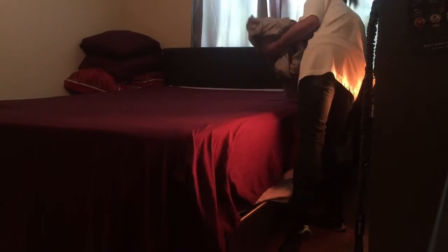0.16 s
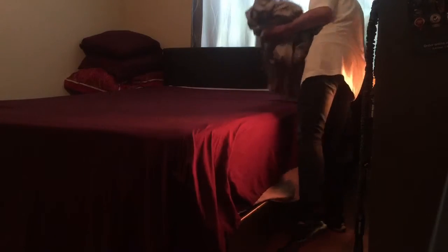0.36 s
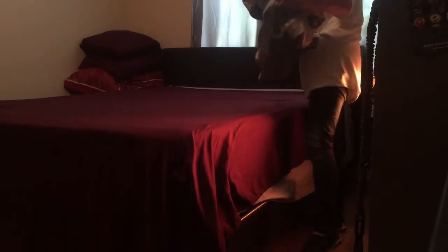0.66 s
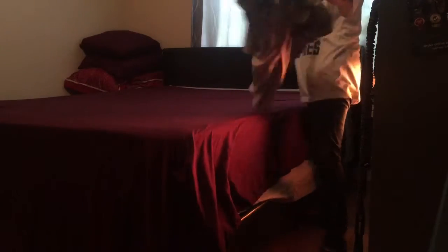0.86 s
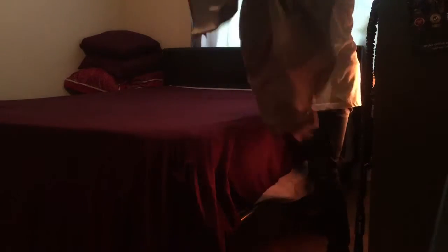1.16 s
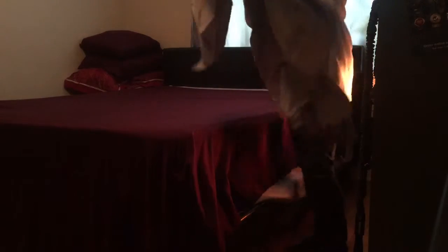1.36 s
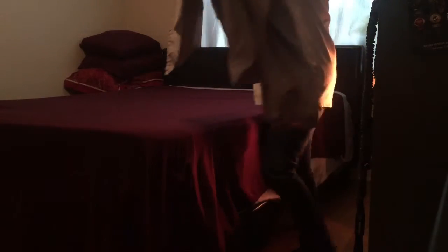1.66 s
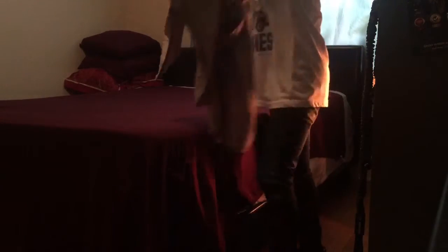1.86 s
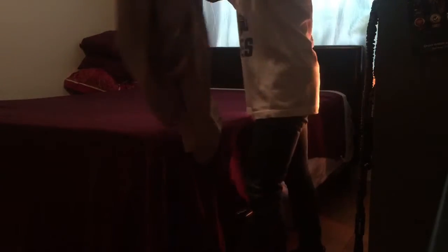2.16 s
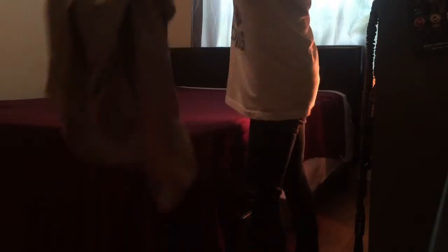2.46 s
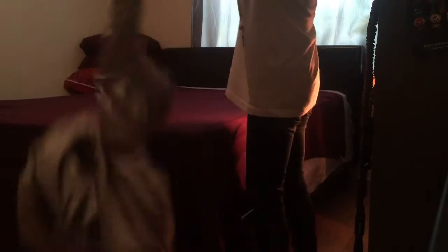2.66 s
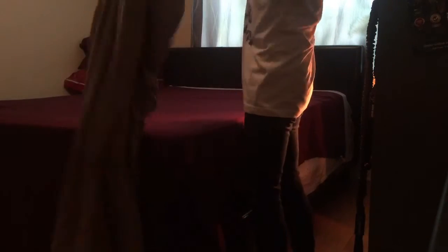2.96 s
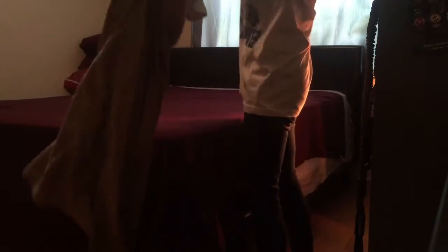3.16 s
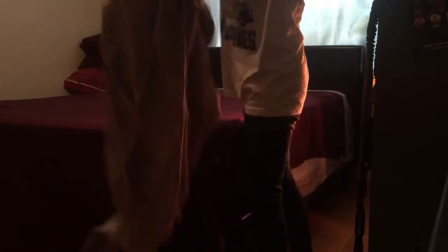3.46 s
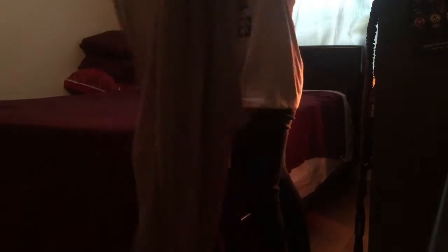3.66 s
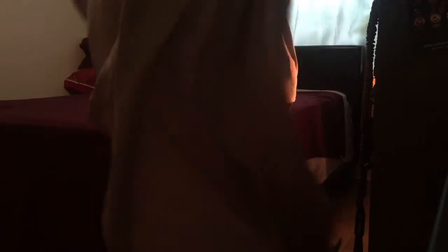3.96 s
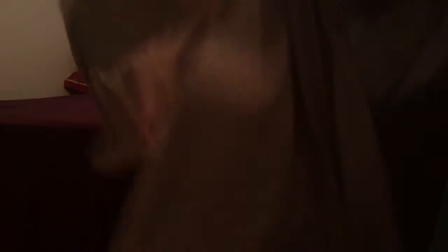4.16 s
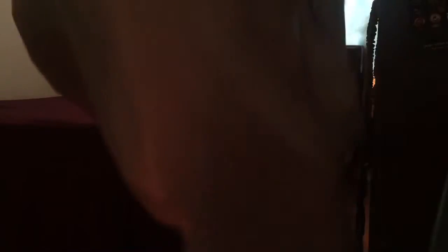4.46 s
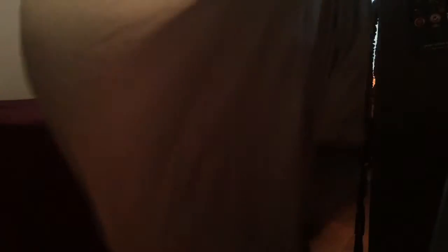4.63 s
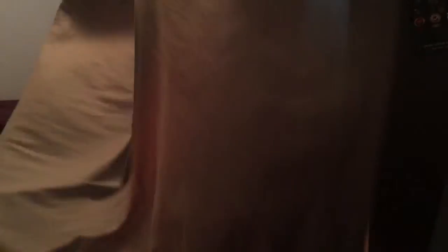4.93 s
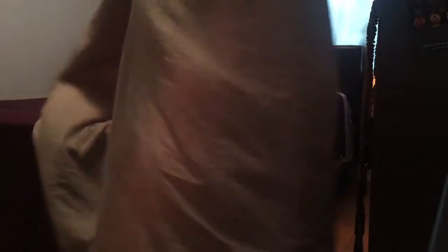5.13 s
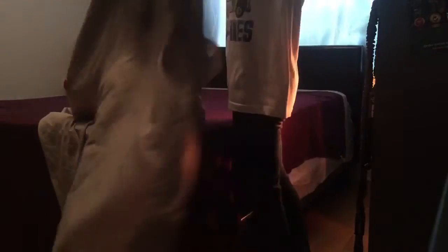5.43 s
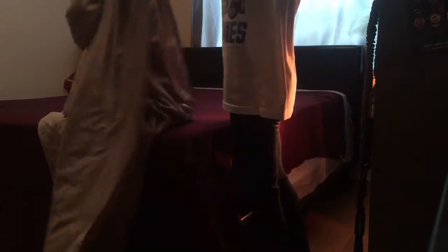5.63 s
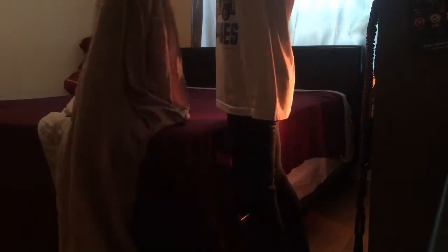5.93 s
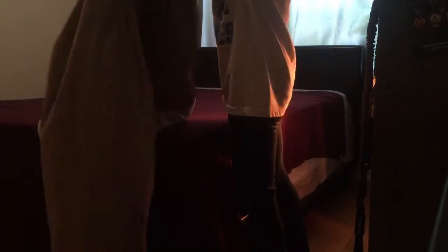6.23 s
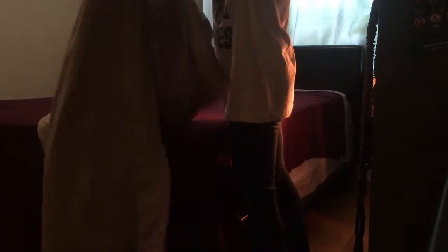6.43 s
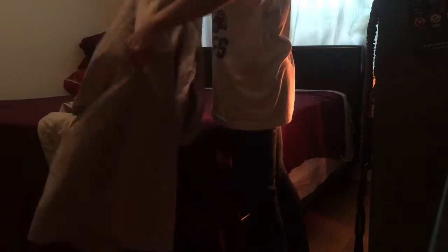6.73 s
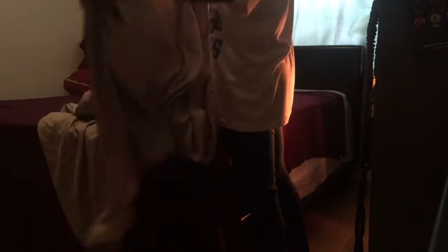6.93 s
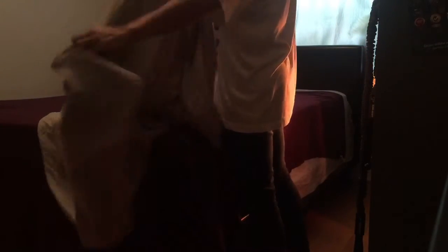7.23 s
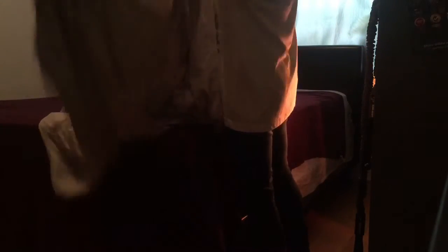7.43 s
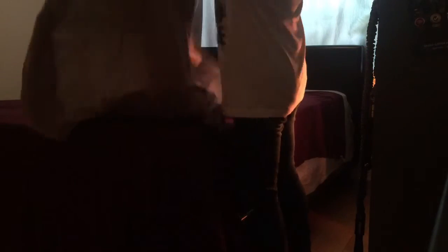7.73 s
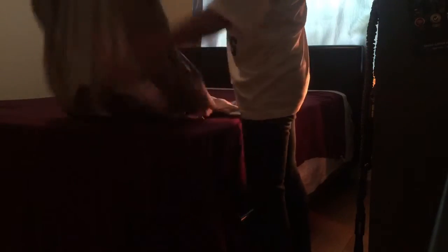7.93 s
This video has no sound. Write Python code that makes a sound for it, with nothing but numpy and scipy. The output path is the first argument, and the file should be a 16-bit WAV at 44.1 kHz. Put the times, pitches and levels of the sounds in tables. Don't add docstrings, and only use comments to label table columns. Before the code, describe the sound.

Cloth rustles and billows in a small room, with whip-like snaps, dull knocks, soft flaps and little crackles, ending in quick snaps.

```python
import sys
import numpy as np
from scipy import signal
from scipy.fft import rfft, irfft, next_fast_len
from scipy.io import wavfile
from scipy.ndimage import uniform_filter1d, map_coordinates

SR = 44100
rng = np.random.default_rng(int(sys.argv[2]) if len(sys.argv) > 2 else 0)


def waveform_to_disk(signal):
    frames = np.transpose(np.atleast_2d(signal))
    scaled = np.clip(frames, -1, 1) * 32767
    samples = np.round(scaled).astype(np.int16)
    wavfile.write(sys.argv[1], SR, samples)


def gain_from_decibels(decibels):
    exponent = np.asarray(decibels, float) / 20
    return 10 ** exponent


N = 356945

# t/s, level/dB
RUMBLE_LEVEL = [(0.0, -55.5), (3.04, -56.5), (3.22, -55.5), (3.9, -51.5), (6.17, -58.5), (7.64, -52),
                (8.09, -55)]
# f/Hz, level/dB
FLAP_COLOUR = [(71, -8.5), (120, -4), (353, -0.5), (396, -0.5), (445, -2), (479, -3.5), (1500, -18),
               (1950, -49), (3300, -77), (6000, -120)]
# f/Hz, level/dB
RUB_COLOUR = [(290, -28), (500, -3), (900, 1), (2000, -5.5), (2360, -9), (2800, -16), (3710, -18),
              (5000, -25.5), (6500, -25.5), (11000, -120)]
# f/Hz, level/dB
SWISH_COLOUR = [(2060, -2), (3500, -5), (4320, -6.5), (4930, -6.5), (6090, -7.5), (7600, -11.5),
                (9200, -10), (10400, -14.5), (11500, -12.5), (14500, -16.5), (15200, -13), (16000, -43)]
# f/Hz, level/dB
TRAFFIC_COLOUR = [(15, -54), (25, -12), (43, -9), (51, -7.5), (64, -4.5), (113, -2.5), (178, -10.5),
                  (204, -37), (222, -26.5), (254, -66), (300, -45), (390, -46), (660, -120)]
# f/Hz, level/dB
HISS_COLOUR = [(120, -52), (200, -1), (236, -3.5), (254, -5), (311, -8.5), (360, -11), (473, -16.5),
               (2380, -19), (2860, -21.5), (3130, -20.5), (5130, -22), (5940, -23.5), (10300, -27.5),
               (15100, -30.5), (16000, -41)]
# delay t/s, level/dB
REFLECTIONS = [(.002, -2), (.0035, -7.5), (.0075, -8), (.0085, -14.5), (0.0098, -8.5), (0.0117, -26),
               (0.017, -8.5), (.0195, -9), (.023, -11)]
# f/Hz, time to fall 60 dB t/s
DECAY_TIMES = [(150, 0.32), (500, 0.23), (1400, 0.22), (3700, 0.26), (9000, 0.23), (15000, 0.23)]
# t/s, level/dB, rub over flap/dB, swell time/s
FLAPS = [(0.201, -72, -14, 0.0078), (0.993, -52, -11, 0.0088), (2.071, -45.5, -1, 0.01),
         (2.856, -41, -7, 0.011), (3.132, -40, -8, 0.0064), (3.242, -55, 2, 0.0089),
         (3.352, -44, -1.5, 0.016), (3.493, -48, -6.5, 0.013), (3.735, -32.5, -3, 0.0061),
         (3.848, -48.5, -7, 0.03), (4.187, -34.5, -11.5, 0.018), (4.289, -44.5, -18, 0.016),
         (4.33, -49, -18, 0.012), (4.435, -48.5, -23, 0.021), (4.579, -48, 1.5, 0.012),
         (4.809, -52, -27, 0.014), (5.266, -48, -25, 0.022), (5.346, -51.5, -3.5, 0.019),
         (6.23, -66, -1, 0.044), (6.639, -46.5, -3.5, 0.011), (6.727, -65, -18, 0.0054),
         (6.927, -56, -20, 0.0073), (6.975, -50.5, -27, 0.0065), (7.067, -56.5, -19, 0.012),
         (7.149, -55, -23, 0.0062), (7.293, -58, -7, 0.0065), (7.463, -56, -24, 0.013),
         (7.536, -50, -15, 0.013), (7.688, -43, -1, 0.019),
         (1.031, -43, -24, 0.05),
    (1.619, -38.5, -9, 0.0052),
    (2.732, -63, -10, 0.0061),
    (3.689, -41, -1.5, 0.03),
    (5.237, -48, -9, 0.016),
    (7.984, -46.5, 5, 0.0072),
]
# f/Hz, width/Hz, level/dB
THUD_MODES = [(196, 21, 8), (366.5, 51, 3), (292, 330, -10.5)]
# f/Hz, width/Hz, level/dB
BOUNCE_PEAKS = [(950, 240, 11), (1426, 89, 12.5), (1970, 260, 5), (2130, 76, -27), (4570, 490, 9)]
# middle t/s, spread/s, swish level/dB, rub over swish/dB
DRAGS = [(0.23, 0.054, -66.5, -2), (0.82, 0.067, -69.5, 5), (1.16, 0.11, -65.5, 3), (1.66, 0.077, -80, 8),
         (2.62, 0.026, -52, -2.5), (2.9, 0.098, -50, -2.5), (3.11, 0.038, -60.5, 8),
         (3.36, 0.042, -59, 5.5), (3.53, 0.073, -59, 2.5), (3.77, 0.037, -52, -14),
         (4.02, 0.053, -67.5, 10.5), (4.22, 0.031, -62, 21), (4.48, 0.094, -55.5, -1.5),
         (4.96, 0.1, -61.5, -5), (5.1, 0.022, -77, 7), (5.31, 0.045, -57.5, -9), (5.48, 0.097, -62, -6),
         (6.0, 0.068, -82, 2), (6.31, 0.082, -68, -1), (6.71, 0.079, -58.5, -25), (7.1, 0.14, -68, -13),
         (7.38, 0.093, -61, 5.5), (7.7, 0.039, -61, 13.5), (7.91, 0.033, -58.5, 4)]
# middle t/s, spread/s, flap level/dB, rub over flap/dB
BILLOWS = [(0.0, 0.025, -67.5, 1.5), (0.2, 0.051, -67, -28), (0.37, 0.023, -70.5, 1.5),
           (0.85, 0.17, -73.5, -5), (1.1, 0.039, -59, 8.5), (1.22, 0.06, -59, -23),
           (1.69, 0.051, -63.5, -25), (2.15, 0.22, -84, 7.5), (2.6, 0.1, -68, -1), (2.7, 0.046, -62.5, 9),
           (2.83, 0.017, -43, -18), (3.1, 0.032, -54, -8), (3.49, 0.03, -49, -20), (3.78, 0.061, -42.5, -7),
           (4.1, 0.035, -43.5, -4.5), (4.3, 0.098, -45, -20), (4.6, 0.029, -46, -5), (4.83, 0.05, -60, -23),
           (5.1, 0.03, -52.5, -6.5), (5.29, 0.06, -56, -21), (5.71, 0.049, -65.5, -19),
           (6.0, 0.07, -68.5, 2.5), (6.26, 0.042, -79, -8), (6.7, 0.074, -55.5, -25),
           (6.96, 0.034, -57, -17), (7.22, 0.045, -78, -11), (7.43, 0.1, -49.5, -28),
           (7.68, 0.068, -56, -19), (8.0, 0.015, -47, 0)]
# t/s, peak level/dB, thud/dB, sparkle/dB, hardness/dB
WHIP = [
    (1.058, -37.5, -17, -7, -7),
    (1.0714, -17, -38, -10.5, -2),
    (1.0833, -34.5, -1, -3.5, -4.5),
    (1.093, -34.5, -6, -1.5, -11),
    (1.2147, -46, -14, -10, -2.5),
]
# t/s, peak level/dB, thud/dB, sparkle/dB, hardness/dB
SNAPS = [(2.5668, -20, -22.5, -17.5, 1.5), (2.8, -52, 7, 8, 15), (3.3243, -26.5, -13, -14.5, -3),
         (3.7441, -24.5, -5, -17.5, 0.5), (4.0393, -29.5, -31, -13, -1.5), (4.743, -40, -5.5, -21, 2),
         (4.931, -32, -10, -11, -2.5), (5.044, -32, -35, -11, 2.5), (5.0479, -36.5, -10, -5.5, -3.5),
         (5.911, -26.5, -17.5, -20.5, -0.5), (7.6438, -29, -20, -23, 4), (7.8735, -26, -25, -17, 1.5),
         (7.9162, -29, -14, -19, 0.5)]
# t/s, peak level/dB, thud/dB, wall answer/dB, hardness/dB
KNOCKS = [(0.9999, -31, -5, 4, -1), (1.0157, -39, -12, 3, 1.5), (1.5855, -39, 4.5, -7.5, -2.5),
          (1.5924, -45, -18, 11, 9), (1.6034, -40.5, -14, -5, -3), (1.6123, -34, -1.5, -4, -4),
          (2.0676, -32.5, -7.5, 1, -3), (2.0874, -43.5, -3, 10.5, -1.5), (2.638, -48, -10, 8.5, -2),
          (2.722, -33, -9, 0.5, 0.4), (2.9373, -46, -14, 13.5, 4), (3.6771, -46, -16, 7, -2),
          (4.071, -35, -16, -23, -1.5), (4.72, -36, -9, 1, -3), (5.1103, -34, -37, -2.5, 2),
          (6.0444, -36.5, -11.5, -6.5, -4), (7.6949, -41.5, -7.5, 7.5, -2.5),
          (7.9795, -27.5, -9.5, -4.5, -1)]
# t/s, peak level/dB, thud/dB, sparkle/dB
SLAPS = [
    (4.1952, -27.5, -13, -36),
    (4.3903, -36.5, -27, -32),
    (4.4425, -34, -23, -10),
    (7.3002, -44, 2.5, -10),
]
# t/s, peak level/dB, sparkle/dB, treble lift/dB
CRACKLES = [(0.068, -39.5, -1.5, 8.5), (0.7632, -32.5, -7.5, 12), (0.8165, -37.5, -5.5, 9),
            (0.851, -44.5, 0.5, 6), (0.901, -52.5, 2, 1), (1.638, -42.5, -8.5, 13), (1.649, -50, -18, 2),
            (2.6024, -36.5, -12, -9), (3.9857, -51, -13, -2), (4.125, -40, -16, 5), (4.995, -59, -8, 0)]
# middle t/s, level/dB
THROBS = [(.12, -73), (.2, -51), (.5, -54), (.87, -59), (1.04, -46.5), (1.4, -47), (1.64, -49),
          (1.88, -48.5), (2.09, -53), (2.329, -50.5), (2.53, -56), (2.76, -52), (2.869, -48), (3.14, -50),
          (3.36, -46), (3.72, -46), (3.83, -52), (4.53, -51), (4.86, -52), (5.11, -49), (5.4, -49),
          (5.76, -50), (5.87, -48), (6.18, -61), (6.3, -46.5), (6.52, -51), (6.72, -47.5), (7.09, -48.5),
          (7.55, -53), (7.81, -47.5)]
# t/s, peak level/dB, f/Hz, dying
# time/s
PUFFS = [(.0705, -41.5, 2290, 0.0013), (.7635, -39, 2640, .0015), (.8175, -41.5, 2540, .002),
         (.8515, -45.5, 2830, 0.0027), (.9025, -48.5, 2760, 0.0037), (1.0835, -34, 7450, .0015),
         (1.0925, -40, 8500, .0015), (1.2165, -48, 906, 0.0023), (1.586, -41, 2200, 0.0013),
         (1.593, -44, 2600, .002), (1.6045, -48, 1600, .002), (1.612, -35.5, 2080, .003),
         (2.0675, -38, 1620, 0.0019), (2.068, -44, 3400, 0.0025), (2.575, -45, 1430, .006),
         (2.866, -40, 700, 0.0078), (2.957, -43, 1570, .003), (3.107, -50, 810, .003),
         (3.128, -47, 710, 0.0036), (3.3255, -37.5, 990, 0.0013), (3.333, -48, 1460, 0.003),
         (3.361, -47, 1030, .004), (3.5, -44, 780, 0.0066), (3.701, -49, 590, .004),
         (3.755, -42, 8900, .002), (3.764, -43, 8750, .002), (3.857, -41, 810, 0.0085),
         (4.019, -41, 1090, 0.0016), (4.0725, -34, 2640, 0.0023), (4.328, -41, 900, 0.0046),
         (4.592, -40.5, 820, 0.0032), (4.7205, -42.5, 2260, 0.002), (4.742, -44.5, 990, 0.004),
         (4.921, -41, 1560, 0.0034), (4.931, -31.5, 2170, 0.00099), (4.94, -39.5, 1900, 0.02),
         (5.111, -51, 3000, .002), (5.36, -51, 2020, 0.0089), (5.9115, -39, 1000, 0.0026),
         (5.912, -48, 1980, 0.0021), (5.92, -41, 1490, 0.0069), (5.965, -57, 1400, 0.0089),
         (6.0455, -44, 1010, 0.0026), (6.052, -48, 1430, 0.0066), (6.933, -48, 950, 0.008),
         (7.472, -40.5, 657, 0.0029), (7.644, -40, 2480, 0.0018), (7.874, -32, 3100, 0.00093),
         (.0702, -41, 12400, .001), (.195, -49.5, 330, 0.0084), (.763, -46, 12100, 0.00092),
          (.817, -43, 11500, .001), (.851, -43, 11500, 0.0011), (.902, -47, 11500, .001),
          (1.071, -22.5, 4160, 0.001), (1.0741, -38, 2040, .0005), (2.5672, -35.5, 11600, 0.0011),
          (2.734, -43, 243, 0.0089), (2.938, -52, 2440, 0.0018), (2.985, -46, 1930, 0.0049),
          (3.022, -58, 1220, 0.0044), (3.744, -36.5, 12000, .001), (3.7443, -31, 900, .005),
          (3.753, -43, 1330, 0.0065), (4.18, -34.5, 505, 0.0038), (4.225, -40, 920, .006),
          (4.9308, -41, 9000, 0.0011), (5.049, -44, 885, 0.0048), (5.245, -52, 554, 0.0099),
          (6.231, -57, 400, 0.014), (6.61, -52, 1050, 0.0076), (6.63, -50, 700, 0.0086),
          (6.649, -66, 505, 0.0095), (6.98, -52, 430, 0.0045), (7.073, -66, 380, .008),
          (7.159, -59, 332, 0.0035), (7.241, -55, 350, 0.0074), (7.352, -55, 340, 0.0069),
          (7.374, -50, 460, .006), (7.429, -45, 350, 0.0088), (7.566, -48, 654, 0.0038),
          (7.98, -36, 760, 0.0034)]
# middle t/s, spread/s, level/dB, f/Hz
SINGING = [(1.225, 0.013, -67, 6000), (1.655, 0.014, -66, 6250), (2.65, 0.035, -59, 4330),
           (2.9, 0.023, -60.5, 5890), (2.99, 0.035, -61, 3870), (4.47, 0.023, -57, 6140),
           (4.49, 0.026, -60.5, 3700), (4.53, 0.093, -70, 6150), (5.31, 0.014, -66.5, 4030),
           (6.64, 0.018, -63.5, 930), (6.75, 0.024, -67.5, 3480), (7.29, 0.012, -65.5, 6400)]
# f/Hz, width/Hz, level/dB
LOW_MODES = [(110.8, 65, -5)]
# middle t/s, spread/s, level/dB, f/Hz
STREAKS = [
    (2.161, 0.026, -69, 1900),
    (2.679, 0.055, -61, 2350),
    (2.96, 0.057, -57, 2350),
    (4.46, 0.02, -65.5, 6050),
    (5.5, 0.036, -69, 2280),
    (6.64, .04, -68.5, 2280),
    (7.15, .04, -76, 2400),
    (7.43, .02, -71, 2380),
    (7.471, 0.012, -65, 1580),
    (7.52, 0.042, -84, 2200),
]
# f/Hz, width/Hz, share removed
PORT_DIPS = [(4970, 560, 0.36), (10400, 680, 0.33)]
# t/s, peak level/dB, f/Hz
TICKS = [(1.0721, -19, 2300), (1.6147, -37, 2190), (2.0672, -34.5, 1660), (2.079, -40, 348),
         (2.5668, -24.5, 3060), (2.690, -52, 1310), (2.7995, -52, 1070), (2.866, -39, 750),
         (2.882, -54, 504), (2.9365, -44, 2430), (2.964, -37.5, 1530), (3.075, -46, 1520),
         (3.3243, -33, 3000), (3.7438, -28.5, 3530), (3.7462, -28, 535), (4.931, -40, 2650),
         (5.9112, -38, 2860), (7.274, -48, 800), (7.354, -55, 830), (7.455, -42, 850), (7.8735, -38, 3100),
         (7.875, -45.5, 950), (7.8825, -42, 1350), (7.9165, -36, 1000), (7.925, -44, 1400),
         (7.979, -36, 900), (7.9825, -47, 1110)]


def unit(x):
    return x / np.sqrt(np.mean(x ** 2) + 1e-20)


def along(points, hz):
    f, v = np.transpose(points)
    return np.interp(np.log(hz + 1), np.log(f + 1), v)


def wobble(rate):
    knots = rng.standard_normal(int(N / SR * rate) + 4)
    return map_coordinates(knots, [np.arange(N) * rate / SR])


def filtered(x, response):
    m = next_fast_len(len(x) + min(4 * len(x), SR // 4))
    return irfft(rfft(x, m) * response(np.fft.rfftfreq(m, 1 / SR)), m)[:len(x)]


def resonance(f, centre_hz, width_hz):
    return 1j * f * width_hz / (centre_hz ** 2 - f * f + 1j * f * width_hz)


def modes(f, rows, gain_db=0):
    return sum(gain_from_decibels(db + gain_db) * resonance(f, hz, width) for hz, width, db in rows)


def rustle(spectrum, patchy_db, share, crackle_db):
    z = signal.stft(rng.standard_normal(N), nperseg=512)[2]
    streaks = uniform_filter1d(rng.standard_normal(z.shape), size=8, axis=1)
    patches = uniform_filter1d(streaks, size=6, axis=0)
    field = unit(patches) + 0.84 * unit(streaks)
    noise = signal.istft(z * gain_from_decibels(patchy_db * unit(field)), nperseg=512)[1][:N]
    slips = (rng.random(N) < share) * gain_from_decibels(crackle_db)
    return unit(filtered(noise * (1 + slips), lambda hz: gain_from_decibels(along(spectrum, hz))))


def tail():
    hz, t, z = signal.stft(rng.standard_normal(SR // 2), SR, nperseg=256)
    decay = gain_from_decibels(-60 * t / along(DECAY_TIMES, hz)[:, None])
    late = signal.istft(z * decay, SR, nperseg=256)[1][:SR // 2]
    late = late * np.clip((np.arange(len(late)) / SR - .006) / 0.0031, .22, 1)
    return late / np.linalg.norm(late)


def gesture_shape(u):
    return -8.5 * (np.sqrt(1 + u * u) - 1)


def gestures(rows):
    t, power = np.arange(0, N, 64) / SR, 0
    for s, spread, db, rub_db in rows:
        u = (t - s) / spread / np.where(t > s, 0.91, 1)
        power = power + gain_from_decibels(np.array([[db], [db + rub_db]]) + gesture_shape(u)) ** 2
    return [np.interp(np.arange(N) / SR, t, row) for row in power]


def background():
    level_db = np.interp(np.arange(N) / SR, *np.transpose(RUMBLE_LEVEL))
    rumble = rustle(TRAFFIC_COLOUR, patchy_db=0.5, share=0, crackle_db=0)
    rumble = unit(gain_from_decibels(1.15 * wobble(12)) * rumble)
    rumble = unit(filtered(rumble, lambda f: 1 + modes(f, LOW_MODES, gain_db=-3)))
    hiss = rustle(HISS_COLOUR, patchy_db=1.8, share=0, crackle_db=0)
    throb, _ = gestures([(s, 0.017, db, 0) for s, db in THROBS])
    return np.sqrt(gain_from_decibels(level_db) ** 2 + throb) * rumble + gain_from_decibels(-70) * hiss


def puffs():
    t = np.arange(4096) / SR
    for s, db, hz, dying in PUFFS:
        puff = np.exp(-t / dying) * rng.standard_normal(len(t))
        pop = filtered(puff, lambda f: resonance(f, hz, hz / 3.4) ** 2)
        yield round(s * SR), gain_from_decibels(db) * pop / np.abs(pop).max()


def ticks():
    push = np.zeros(4096)
    push[0] = 1
    for s, db, hz in TICKS:
        tick = filtered(push, lambda f: resonance(f, hz, hz / 1.9) ** 2)
        yield round(s * SR), gain_from_decibels(db) * tick / np.abs(tick).max()


def singing_edges():
    for rows, sharp in (SINGING, 2.4), (STREAKS, 6):
        for s, spread, db, hz in rows:
            u = np.arange(-SR // 4, SR // 4) / SR / spread
            noise = rng.standard_normal(len(u))
            hiss = unit(filtered(noise, lambda f: resonance(f, hz, hz / sharp) ** 2))
            yield round(s * SR) - SR // 4, gain_from_decibels(db + gesture_shape(u)) * hiss


def small_sounds():
    dry = np.zeros((2, N + SR))
    for source in puffs(), ticks(), singing_edges():
        for k, (start, sound) in enumerate(source):
            dry[k % 2, start:][:len(sound)] += sound
    wet = sum(signal.fftconvolve(part, tail())[:N + SR] for part in dry)
    return (dry.sum(0) + gain_from_decibels(-8.5) * wet)[:N]


def blows():
    rows = []
    for s, db, thud, spark, hard in SNAPS:
        rows.append((s, db, thud, spark, hard, hard + 10, -1.5 - 0.21 * (db + 40.5)))
    for s, db, thud, spark, hard in WHIP:
        rows.append((s, db, thud, spark, hard, -7.5, -1.5 - 0.21 * (db + 53)))
    for s, db, spark, lift in CRACKLES:
        rows.append((s, db, -27.5, spark, 1, lift, -1))
    for s, db, thud, wet, hard in KNOCKS:
        rows.append((s, db, thud, -38, hard, hard, wet))
    for s, db, thud, spark in SLAPS:
        rows.append((s, db, thud, spark, -8.5, -8.5, -8.5))
    return rows


def motion():
    flap, fold_rub = gestures(BILLOWS)
    swish, drag_rub = gestures(DRAGS)
    return np.array([flap, fold_rub + drag_rub, swish])


def swells():
    t, power = np.arange(N) / SR, np.zeros((3, N))
    for s, db, rub_db, rise in FLAPS:
        u = t[:SR // 4] / np.clip(rise, .003, .04)
        start = round(s * SR)
        levels = gain_from_decibels([[db], [db + rub_db], [db + rub_db - 17.5]])
        swell = levels * u * np.exp(1 - u)
        power[:, start:start + len(u)] += swell[:, :N - start] ** 2
    before = np.exp((t[:2400] - t[2400]) / 0.006)
    for s, db, *_ in blows():
        start = round(s * SR)
        power[1, start - 2400:start] += (gain_from_decibels(.5 * (db - 40) - 24) * before) ** 2
    return power


def sheet():
    flap_gain, rub_gain, swish_gain = np.sqrt(motion() + swells())
    flutter = wobble(30)
    flap = rustle(FLAP_COLOUR, patchy_db=1.5, share=.004, crackle_db=13)
    flap *= flap_gain * gain_from_decibels(2.03 * flutter + 0.5 * wobble(60))
    rub = rustle(RUB_COLOUR, patchy_db=3.5, share=.008, crackle_db=10)
    rub *= rub_gain * gain_from_decibels(0.91 * flutter + 2.87 * wobble(70))
    swish = rustle(SWISH_COLOUR, patchy_db=1.9, share=0.0091, crackle_db=5)
    swish *= swish_gain * gain_from_decibels(2.0 * flutter + 1.1 * wobble(50))
    turns = np.arange(N) * 4 // SR % 2 == [[0], [1]]
    dry = (flap + rub + swish) * turns
    wet = sum(signal.fftconvolve(part, tail())[:N] for part in dry)
    return 0.69 * dry.sum(0) + 0.25 * wet


def room_answer(wet_db):
    early = 1 + 0.69 * np.exp(-(np.arange(SR // 2) / SR / 0.022) ** 2)
    diffuse = gain_from_decibels(wet_db) * early * tail()
    echoes = diffuse.copy()
    for delay, echo_db in REFLECTIONS:
        at = round(abs(delay + rng.normal(0, .0003)) * SR)
        echoes[at] += gain_from_decibels(0.63 * wet_db + echo_db + rng.normal(0, 1.9))
    return diffuse, echoes


def blow(thud_db, sparkle_db, hard_db, lift_db, wet_db):
    t = np.arange(1300) / SR
    diffuse, echoes = room_answer(wet_db)
    push = 0.17 * np.exp(-t / 0.00049) * rng.standard_normal(len(t))
    push[0] = 1
    fibres = np.exp(-t / 0.003) * (1.1 - np.exp(-t / 0.00082)) * rng.standard_normal(len(t))
    pitch_hz = 2400 * gain_from_decibels(np.clip(hard_db, -9, 6))

    def mid(f):
        edge = resonance(f, 1.5 * pitch_hz, 1.7 * pitch_hz) / (1j * f / pitch_hz + 1e-9)
        return resonance(f, pitch_hz, 2.6 * pitch_hz) ** 2 * edge ** 2 * (1 - 0.44 * resonance(f, 4700, 800))

    def low(f):
        return resonance(f, 220, 490) * modes(f, THUD_MODES)

    def bright(f):
        high = resonance(f, 5700, 6800) ** 2 * gain_from_decibels(along(SWISH_COLOUR, f) * (f > 5000) * .5)
        return high * ((f + 1) / 9000) ** (0.13 * lift_db)

    def furnished(f):
        return (0.38 + modes(f, BOUNCE_PEAKS, gain_db=-9.5)) / (1 + .8j * f / 2500)

    def near_wall(f):
        return resonance(f, 6800, 5600)

    def peaked(part, db):
        return gain_from_decibels(db) * part / np.abs(part).max()

    crack = peaked(filtered(push, mid), 2.5)
    thud = peaked(filtered(push, low), thud_db + 0.5)
    sparkle = peaked(filtered(fibres, bright), sparkle_db)
    out = signal.fftconvolve(echoes, filtered(crack, furnished) + thud)
    spark = filtered(np.exp(-t / .00002), bright)
    scattered = signal.fftconvolve(diffuse, spark)
    out += 1.27 * scattered * np.linalg.norm(sparkle) / np.linalg.norm(spark)
    out[:len(t)] += 0.72 * crack + thud + filtered(sparkle, lambda f: 1 - .5 * near_wall(f))
    glint_s = 0.0093
    glint = gain_from_decibels(-3.5) * filtered(sparkle, lambda f: near_wall(f) ** 2)
    out[round(glint_s * SR):][:len(t)] += glint
    out[round(2 * glint_s * SR):][:len(t)] += gain_from_decibels(1) * glint
    return out


def snaps():
    out = np.zeros(N + SR)
    for s, db, *character in blows():
        sound = blow(*character)
        out[round(s * SR):][:len(sound)] += gain_from_decibels(db) * sound
    return out[:N]


def scene():
    return (background() + small_sounds() + sheet() + snaps())[None]


def band_limit(x):
    return signal.sosfilt(signal.butter(12, 16500, fs=SR, output="sos"), x)


def record(dry):
    lag_s, knee_hz = .006, 500

    def phone(f):
        phase = np.log(1 + f / knee_hz) - f / (knee_hz + 9000)
        chirp = np.exp(-2j * np.pi * lag_s * knee_hz * phase)
        band = f ** 4 / (f ** 4 + 42.0 ** 4) * (f < 15950)
        port = 1 - sum(share * resonance(f, hz, width) for hz, width, share in PORT_DIPS)
        return chirp * band * port

    return band_limit(filtered(dry[0], phone)[None])


dry = scene()
out = record(dry)
waveform_to_disk(out)
```